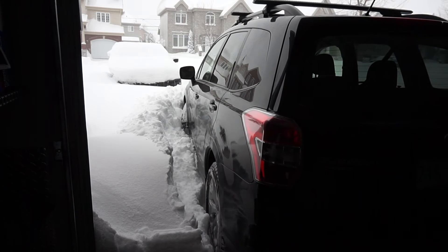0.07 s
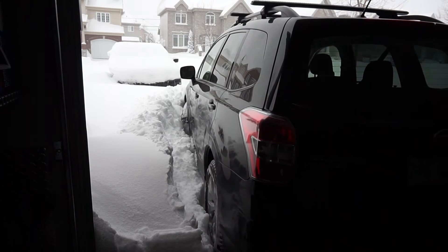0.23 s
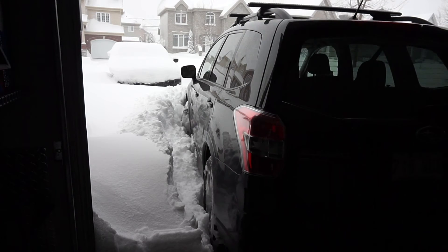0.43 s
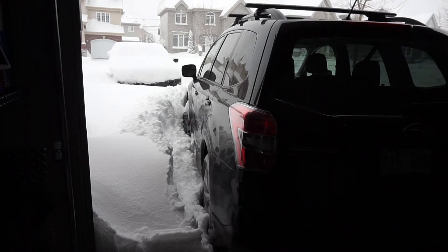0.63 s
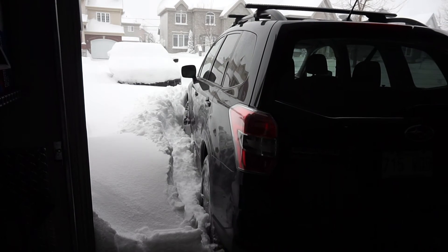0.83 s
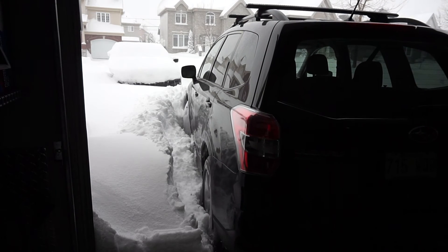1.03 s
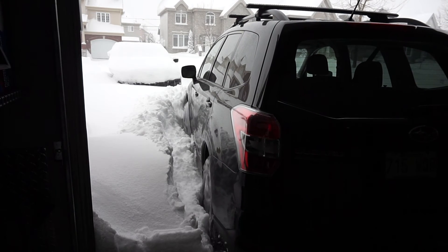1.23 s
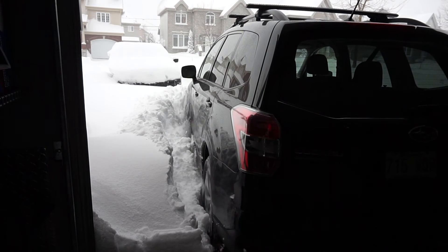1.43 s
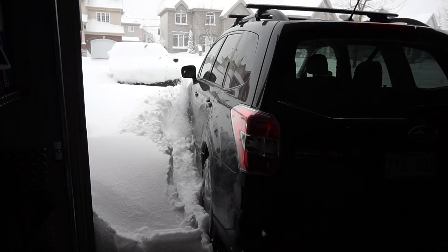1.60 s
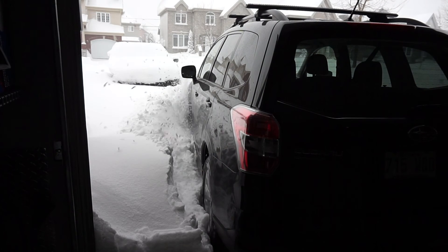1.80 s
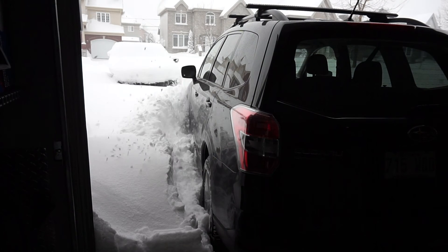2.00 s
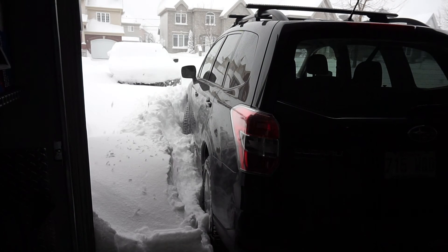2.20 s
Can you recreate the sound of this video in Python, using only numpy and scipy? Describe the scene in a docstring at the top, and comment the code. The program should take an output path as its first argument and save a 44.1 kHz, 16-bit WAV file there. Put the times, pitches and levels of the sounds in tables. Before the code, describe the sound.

A car revs in deep snow, its wheels spinning and flinging snow.

```python
"""A car revs in deep snow a few metres away, its firing harmonics sweeping through the exhaust's boom.
The body bumps and the drivetrain whines while the tyres grind and creak on packed snow; they break
loose with a knock, spin, and fling lumps and powder against the wheel wells. The throttle closes,
clods land, the powder sifts down and the body gives a last dull thump."""
import sys
import numpy as np
from scipy import signal
from scipy.fft import rfft, irfft, next_fast_len
from scipy.io import wavfile
from scipy.ndimage import map_coordinates

SR = 44100
rng = np.random.default_rng(int(sys.argv[2]) if len(sys.argv) > 2 else 0)


def generate_wav(signal):
    """Clip the signal to [-1, 1] and save it as 16-bit WAV at the path in sys.argv[1]."""
    frames = np.transpose(np.atleast_2d(signal))
    scaled = np.clip(frames, -1, 1) * 32767
    pcm = np.round(scaled).astype(np.int16)
    wavfile.write(sys.argv[1], SR, pcm)


N = 103635

# The rev, up and back down. Each row: time in seconds, firing rate in Hz.
FIRING_RATE = [(0, 41.8), (.1, 45.34), (.23, 48.55), (.38, 51.8), (.55, 59.3), (.76, 66.88), (.96, 69.07),
               (1.06, 77), (1.15, 85.7), (1.23, 90.6), (1.35, 92.5), (1.43, 88.4), (1.56, 79.33),
               (1.63, 74.1), (1.7, 59.85), (1.8, 50.04), (2.15, 49.5), (2.35, 45.8)]
# The engine's throb, about one beat to four firings. Each row: time in seconds, beats per second,
# level on the beat in dB, pitch of the engine bay's rings as a ratio.
ENGINE_THROB = [(0, 10.8, -49.5, 0.99), (.2, 12, -41.5, 0.94), (.5, 12.4, -41, 1.02),
                (.63, 15.2, -33, 0.92), (.76, 17.4, -32, 0.98), (.92, 20.8, -29, 1.04),
                (1.08, 19.3, -32, 1.02), (1.25, 21.1, -24, .968), (1.4, 20, -34.5, 0.95),
                (1.6, 19, -42, .96), (2.35, 9.9, -71, 0.99)]


def engine():
    """Firing harmonics sweep through the exhaust's boom, each a little unsteady."""
    # Exhaust fader. Each row: time in seconds, level in dB.
    exhaust_level = [(0, -32), (.06, -48), (.17, -37), (.24, -34.5), (.29, -43), (.34, -36.5), (.41, -39),
                     (.54, -34), (.68, -35.5), (.75, -33), (.84, -39), (.95, -36), (1.02, -39),
                     (1.12, -36.5), (1.22, -32.5), (1.4, -36), (1.5, -36), (1.58, -30), (1.68, -44),
                     (1.81, -41), (1.98, -57), (2.12, -50), (2.35, -52)]
    # Each row: multiple of the firing rate, strength in dB ahead of the pipe.
    harmonics = [(1, -2.5), (2, -1.5), (3, -4), (4, -6), (5, -16.5), (6, -21.5), (7, -11)]
    # The exhaust pipe's resonances. Each row: frequency in Hz, gain in dB.
    pipe_eq = [(40, -40), (65, -22), (82, -29.5), (102, -6.5), (135, -20), (162, -5.5), (196, 4), (212, 1),
               (236, -15), (330, -4), (600, -19)]
    wobble, rough_db, throb_share = .007, 1.5, .49
    firing_hz = curve(FIRING_RATE) * (1 + wobble * walk(23.43))
    phase = 2 * np.pi * np.cumsum(firing_hz) / SR
    boom = 0
    for k, db in harmonics:
        gain = response(pipe_eq, k * firing_hz) * undb(db + rough_db * walk(39.84))
        boom += gain * np.sin(k * phase + 2 * np.pi * rng.random())
    return np.sqrt(2) * boom * undb(curve(exhaust_level)) * (1 + throb_share * beat())


def engine_bay():
    """The hollow engine bay rings with one strong beat in every engine cycle."""
    # Each row: base pitch in Hz, phase wanders per second, relative level in dB.
    rings = [(564.6, 18, -1), (754, 45, -7), (981, 30, -2), (1194, 56, -14)]
    swing_db = 4.5
    phase_per_hz = 2 * np.pi * np.cumsum(curve(ENGINE_THROB, axis=3)) / SR
    pair = np.zeros((2, N))
    for voice in pair:
        for hz, wander, db in rings:
            voice += undb(db) * np.sin(hz * phase_per_hz + 2 * np.pi * rng.random() + walk(wander))
    level_db = curve(ENGINE_THROB, axis=2) + swing_db * (beat() - 1)
    return unit(spread(pair, side_db=10.5)) * undb(level_db)


def beat(peak_s=0.8):
    """The throb's pulse: swings between -1 and 1 once in every engine cycle."""
    cycles = np.cumsum(curve(ENGINE_THROB)) / SR
    return np.cos(2 * np.pi * (cycles - np.interp(peak_s, np.arange(N) / SR, cycles)))


def tyres():
    """Packed snow rumbles under the tread, and the crust tears in sudden crunches."""
    # Tone of the rumble and of the crunch. Each row: frequency in Hz, gain in dB.
    rumble_eq = [(25, -33), (78, -35), (115, -6), (160, 3), (215, 2), (260, 3), (345, 5.5), (450, -0.5),
                 (700, -8.5), (2000, -69)]
    crunch_eq = [(80, -51), (260, -11.5), (400, -3), (650, 1), (900, -3), (1400, -2), (2000, -13),
                 (3000, -18), (4500, -35.5), (6000, -35), (9000, -50), (16000, -51)]
    # Each row: time in seconds, level in dB.
    rumble_level = [(0, -43.5), (.18, -45), (.26, -38), (.5, -37.5), (.75, -42), (1.0, -35.5), (1.3, -35),
                    (1.56, -34), (1.78, -39), (1.95, -45.5), (2.18, -49), (2.35, -62.5)]
    # Each row: start in seconds, level in dB, decay in seconds.
    crunch_hits = [(.728, -44, .012), (.895, -33.5, .011), (.951, -36, .01), (.991, -20, 0.058),
                   (1.022, -29, .015), (1.042, -24.5, .018), (1.128, -28.5, 0.0094), (1.148, -31.5, 0.014),
                   (1.192, -25.5, 0.0095)]
    rumble = spread(colour(grains(1500, scatter_db=2.5), rumble_eq), side_db=-0.5)
    crunch = spread(colour(grains(5000, scatter_db=0.6), crunch_eq), side_db=0.5)
    return rumble * undb(curve(rumble_level)) + crunch * bursts(crunch_hits, attack_s=.002)


def creaks():
    """The tread sticks and slips on packed snow: short, rough groans that swell and fade. The last, low one is
    the body ringing on just after its final thump."""
    # Each row: start in seconds, length in seconds, pitch in Hz, phase wanders per second, level in dB.
    groans = [(0.831, 0.022, 827, 150, -29), (1.483, 0.19, 346, 20, -33.5), (1.732, 0.074, 280.5, 31, -38),
              (2.101, 0.082, 239.4, 12.22, -39.5)]
    t, out = np.arange(N) / SR, 0
    for start, length, hz, wander, db in groans:
        swell = np.sin(np.pi * np.clip((t - start) / length, 0, 1))
        out += np.sqrt(2) * undb(db) * swell * np.sin(2 * np.pi * hz * t + walk(wander))
    return out


def wheel_knock(start_s=1):
    """The wheel rings briefly as the tread breaks loose."""
    # Each row: pitch in Hz, level in dB, decay in seconds.
    wheel_modes = [(390, -26.5, 0.018), (480, -24, 0.0099), (660, -28, 0.052)]
    t, out = np.arange(N) / SR, 0
    for hz, db, decay in wheel_modes:
        ring = np.sqrt(2) * np.sin(2 * np.pi * (hz * t + rng.random()))
        out += ring * bursts([(start_s, db, decay)])
    return out


def flung_snow():
    """The spinning wheels throw a spray of lumps that pelts the wheel wells in uneven spurts."""
    # Tone of the spray and of the spurts. Each row: frequency in Hz, gain in dB.
    spray_eq = [(60, -45), (150, -33), (400, 0), (700, -1), (1200, -2), (1700, -3), (2200, -6.5),
                (2900, -7.5), (3800, -17.5), (6000, -21), (10000, -29), (16000, -39)]
    spurt_eq = [(80, -47), (300, -12), (800, 4), (1500, -3.5), (2150, 3), (2900, -12), (3800, -19),
                (8000, -23), (16000, -36)]
    # Each row: time in seconds, level in dB.
    spray_level = [(0, -74), (.78, -51.5), (.97, -51.5), (1.01, -35.5), (1.1, -43.5), (1.24, -35),
                   (1.29, -27), (1.35, -29), (1.39, -29), (1.45, -30.5), (1.55, -35), (1.72, -39),
                   (1.85, -45), (2.05, -47.5), (2.35, -55.5)]
    # Each row: start in seconds, level in dB, decay in seconds.
    spurt_hits = [(1.263, -23, 0.022), (1.274, -23, 0.023), (1.302, -26.5, .016), (1.317, -24, 0.04),
                  (1.346, -28, 0.015), (1.404, -27, 0.028), (1.439, -29, 0.011), (1.495, -31.5, 0.011)]
    flutter_db = 1.5
    spray = spread(colour(grains(5400, scatter_db=1), spray_eq), side_db=0.8)
    spray *= undb(curve(spray_level) + flutter_db * walk(70.07))
    spurts = spread(colour(grains(3500, scatter_db=1.3), spurt_eq), side_db=1)
    return spray + spurts * bursts(spurt_hits)


def clods():
    """Each clod crumbles as it lands and rings at a pitch of its own."""
    # Each row: start in seconds, level in dB, decay in seconds, ring pitch in Hz.
    landings = [(1.587, -32, .014, 1005), (1.706, -29, 0.013, 1000), (1.974, -37, 0.012, 1547),
                (2.128, -41, .018, 1190), (2.162, -40, 0.019, 1503), (2.189, -45.5, 0.09, 1430)]
    # Tone of the crumble. Each row: frequency in Hz, gain in dB.
    clod_eq = [(80, -38), (300, -26), (700, -16), (1150, 3), (1650, -1.5), (2100, -6), (2700, -7),
               (3500, -26), (10000, -26)]
    ring_width_hz, ring_db = 194, 8
    crumble, out = grains(4000, scatter_db=1), 0
    for start, db, decay, hz in landings:
        ring = colour(crumble, clod_eq, [(hz, ring_width_hz, ring_db)])
        out += spread(ring, side_db=-3) * bursts([(start, db, decay)])
    return out


def frozen_lumps():
    """Frozen lumps crack against the car in hard snaps of noise."""
    # Each row: start in seconds, level in dB, decay in seconds.
    crack_hits = [(.992, -33, 0.011), (1.498, -31, .01), (1.631, -28, .015)]
    # Tone of the crack. Each row: frequency in Hz, gain in dB.
    crack_eq = [(200, -12), (800, 0), (1250, 6.5), (1700, -3), (3000, -12), (4300, -8), (7000, -19.5),
                (16000, -24)]
    crack = spread(colour(rng.standard_normal((2, N)), crack_eq), side_db=-7)
    return crack * bursts(crack_hits, attack_s=.003)


def body_thumps():
    """Soft blows to the body and suspension ring the car's low modes."""
    # Each row: start in seconds, relative strength in dB.
    blows = [(.228, -26), (0.247, -26.5), (0.312, -22.5), (.334, -31), (.465, -29), (.495, -30),
             (1.68, -31), (2.066, -20.5)]
    # Each row: pitch in Hz, relative level in dB, seconds to fall by 60 dB.
    body_modes = [(131.5, -6, 0.1134), (184.7, -1, 0.19), (252.7, -3, 0.35), (288.5, -2.5, 0.2),
                  (337, -7.5, 0.25), (379.5, 7.5, 0.047), (457, -5, 0.26), (549, 6.5, 0.032)]
    detune, attack_s = .0203, .0062
    t, out = np.arange(N) / SR, 0
    for start, db in blows:
        age = np.maximum(t - start, 0)
        for hz, mode_db, t60 in body_modes:
            pitch = hz * (1 + detune * rng.standard_normal())
            ring = np.sin(2 * np.pi * pitch * age + 2.32 * rng.standard_normal())
            envelope = np.minimum(age / attack_s, 1) * np.exp(-np.log(1000) * age / t60)
            out += undb(db + mode_db) * ring * envelope
    return 0.35 * out


def drivetrain_whirr():
    """The loaded drivetrain whirrs: resonant noise that pulses with the firings."""
    # Broad tone. Each row: frequency in Hz, gain in dB.
    whirr_eq = [(60, -52), (300, -19), (480, 3.5), (800, -0.5), (1150, -2), (1500, -10), (2000, -19),
                (2700, -23), (3500, -37.5), (4600, -29), (7000, -45), (15000, -58)]
    # Narrow resonances. Each row: centre in Hz, width in Hz, boost in dB.
    whirr_rings = [(550, 23, 7.1), (910, 62, 1.1), (1322.4, 19, 11.3)]
    # Each row: time in seconds, level in dB.
    whirr_level = [(0, -56.5), (.15, -49.5), (.3, -43.5), (.6, -41.5), (.8, -37.5), (.97, -30.5),
                   (1.2, -30.5), (1.45, -33.5), (1.7, -41.5), (1.95, -48), (2.35, -85)]
    firing_phase = 2 * np.pi * np.cumsum(curve(FIRING_RATE)) / SR
    pulsing = rng.standard_normal((2, N)) * (1 + 0.12 * np.sin(firing_phase))
    return spread(colour(pulsing, whirr_eq, whirr_rings), side_db=-2) * undb(curve(whirr_level))


def drivetrain_whine():
    """A rough, throbbing whine, with a softer tone one firing rate below it."""
    # Each row: time in seconds, pitch in Hz, level in dB.
    glide = [(0, 522, -55.5), (.3, 520.4, -48), (.39, 524, -41.5), (.52, 548, -45.5), (.64, 580.7, -41.5),
             (.79, 593, -36), (.86, 597, -44), (.96, 598.3, -34), (1.08, 590, -44), (1.15, 593, -29),
             (1.22, 608.6, -29.5), (1.29, 605, -37), (1.6, 580.7, -48), (2.35, 452, -89)]
    flutter_db, jitter_rad, lower_db, throb_share = 2.5, .8, -11, .44

    def rough_tone(angle):
        flutter = undb(flutter_db * walk(34.3))
        return flutter * np.sin(angle + jitter_rad * walk(30) + 2 * np.pi * rng.random())

    phase = 2 * np.pi * np.cumsum(curve(glide)) / SR
    lower_phase = phase - 2 * np.pi * np.cumsum(curve(FIRING_RATE)) / SR
    pair = np.array([rough_tone(phase) + undb(lower_db) * rough_tone(lower_phase) for _ in range(2)])
    pair *= 1 + throb_share * beat()
    return spread(pair, side_db=-14) * undb(curve(glide, axis=2))


def powder():
    """Fine snow sifts down close by in a grainy hiss, and a few ice specks tick as they strike."""
    # Tone of the powder and of the ticks. Each row: frequency in Hz, gain in dB.
    powder_eq = [(500, -18), (2000, 1), (4500, -3.5), (8000, -4), (12000, -1.5), (16000, -0.5)]
    tick_eq = [(1000, 6), (5000, -3), (9000, -8), (11500, 7), (16000, -7)]
    # Each row: time in seconds, level in dB.
    powder_level = [(0, -72), (.7, -72), (.84, -58.5), (.96, -60.5), (1.01, -50), (1.12, -51.5),
                    (1.15, -45), (1.22, -48.5), (1.29, -36.5), (1.4, -42.5), (1.58, -42), (1.74, -44.5),
                    (1.79, -38), (1.88, -40.5), (1.92, -40.5), (2.0, -42), (2.2, -47.5), (2.35, -55)]
    # Each row: start in seconds, level in dB, decay in seconds.
    tick_hits = [(1.234, -27.5, 0.00097), (1.632, -30.5, 0.003), (1.863, -36, 0.0025)]
    flutter_db = 1.27
    hiss = grains(9000, scatter_db=0.5) + 0.59 * rng.standard_normal((2, N))
    sift = spread(colour(hiss, powder_eq), side_db=-0.5)
    sift *= undb(curve(powder_level) + flutter_db * walk(44.95))
    ticks = spread(colour(rng.standard_normal((2, N)), tick_eq))
    return sift + ticks * bursts(tick_hits, attack_s=.0011)


def walls(x, wet_db=-9, t60_s=.21, delay_s=.0015):
    """Close walls add a short, dense slap."""
    t = np.arange(N // 8) / SR
    tail = rng.standard_normal(len(t)) * (t > delay_s) * np.exp(-np.log(1000) * t / t60_s)
    wet = signal.fftconvolve(x, tail[None] / np.linalg.norm(tail), axes=1)[:, :N]
    return (x + undb(wet_db) * wet) / np.hypot(1, undb(wet_db))


def whistle(hz=15735, db=-71.5):
    """A thin, barely audible high tone."""
    return np.sqrt(2) * undb(db) * np.sin(2 * np.pi * hz * np.arange(N) / SR + walk(25))


def undb(db):
    """Decibels to gain."""
    return 10 ** (np.asarray(db) / 20)


def curve(rows, axis=1):
    """One column of a table, joined by straight lines in time."""
    rows = np.array(rows)
    return np.interp(np.arange(N) / SR, rows[:, 0], rows[:, axis])


def response(points, hz):
    """Gain of (Hz, dB) points at the given frequencies."""
    f, db = np.array(points).T
    return undb(np.interp(np.log(np.maximum(hz, 1)), np.log(f), db))


def unit(x):
    """Scale to rms 1."""
    return x / np.sqrt(np.mean(x ** 2))


def colour(x, points, rings=()):
    """Filter by a broad EQ curve and any narrow resonances."""
    size = next_fast_len(2 * N)
    hz = np.arange(size // 2 + 1) * SR / size
    gain = response(points, hz)
    for centre, width, db in rings:
        gain = gain * (1 + (undb(db) - 1) / (1 + 2j * (hz - centre) / width))
    return irfft(rfft(x, size) * gain, size)[..., :N]


def spread(pair, side_db=0):
    """Two unrelated signals as mid and side: bass centred, treble wide."""
    # Stereo width. Each row: frequency in Hz, side gain in dB before side_db is added.
    side_eq = [(60, -27), (170, -19), (300, -23.5), (520, -14), (1000, -3), (2200, -2.5), (4500, 1),
               (8000, -3), (16000, -8.5)]
    mid, side = unit(pair[0]), undb(side_db) * colour(unit(pair[1]), side_eq)
    return np.array([mid + side, mid - side])


def walk(rate):
    """Smooth random wander with rms 1, through `rate` points a second."""
    knots = rng.standard_normal(2048)
    return unit(map_coordinates(knots, [np.arange(N) / SR * rate], order=3, mode="mirror"))


def grains(per_s, scatter_db):
    """Two showers of tiny impacts, most weak and a few strong."""
    hit = rng.random((2, N)) < per_s / SR
    polarity = rng.choice([-1, 1], (2, N))
    return hit * polarity * undb(scatter_db * np.minimum(rng.exponential(size=(2, N)), 6))


def bursts(rows, attack_s=.0021):
    """Envelope of hits that rise quickly and die away."""
    t, power = np.arange(N) / SR, 0
    for start, db, decay in rows:
        age = np.maximum(t - start, 0)
        rise = np.minimum(age / attack_s, 1)
        fall = np.exp(-np.maximum(age - attack_s, 0) / decay)
        power += (undb(db) * rise * fall) ** 2
    return np.sqrt(power)


def scene():
    """The straining car, its tyres' fight for grip and the snow they throw."""
    car = engine() + engine_bay() + body_thumps() + drivetrain_whirr() + drivetrain_whine()
    grip = tyres() + creaks() + wheel_knock()
    snow = walls(flung_snow()) + clods() + frozen_lumps() + powder()
    return car + grip + snow + whistle()


def record(dry):
    """A steep low-pass trims the very top of the treble."""
    top_hz = 16100
    return signal.sosfilt(signal.ellip(10, .2, 70, top_hz, fs=SR, output="sos"), dry)


dry = scene()
out = record(dry)
generate_wav(out)
```